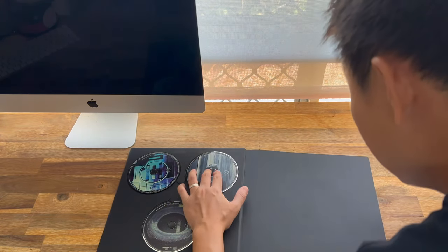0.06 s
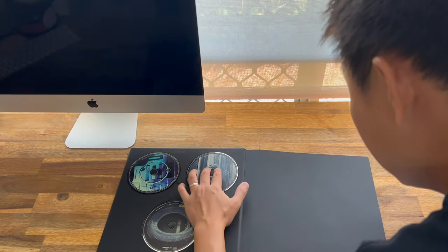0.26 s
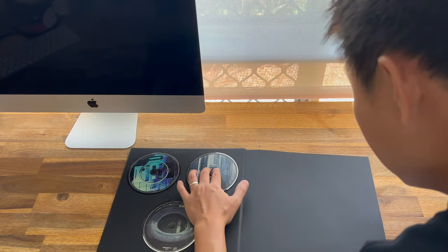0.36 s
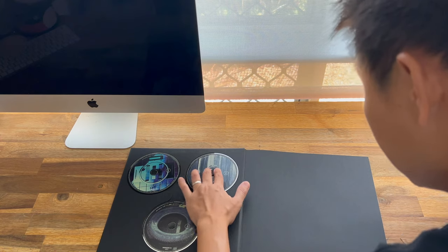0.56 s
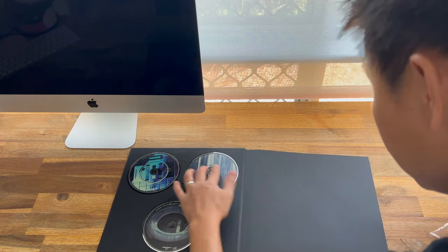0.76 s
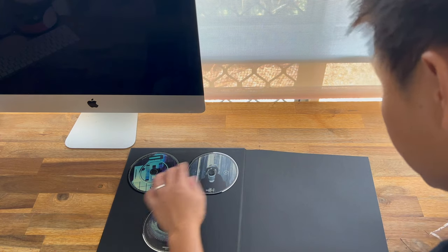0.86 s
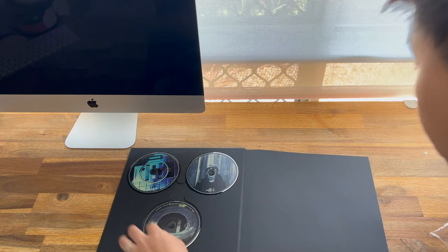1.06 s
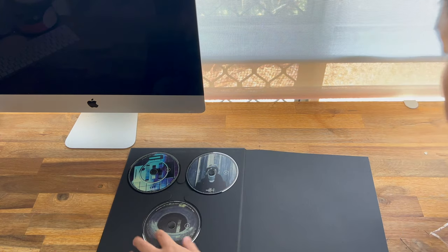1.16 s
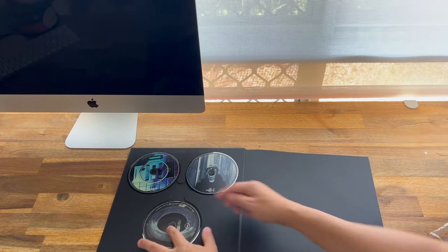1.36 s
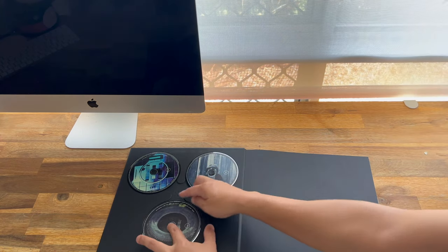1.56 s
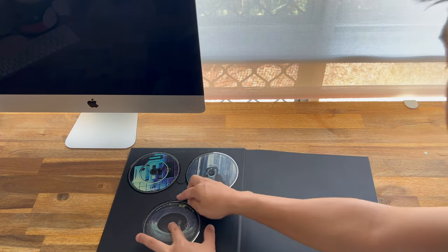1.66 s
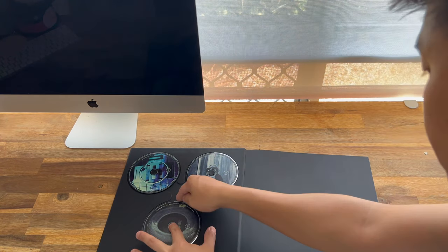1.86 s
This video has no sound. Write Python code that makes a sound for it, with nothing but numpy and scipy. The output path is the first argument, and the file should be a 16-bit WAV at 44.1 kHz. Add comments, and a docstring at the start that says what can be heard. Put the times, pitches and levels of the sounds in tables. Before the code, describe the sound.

Compact discs snap onto plastic spindles in a hardcover book on a table. A light click at 0.2 seconds leads to two sharp snaps near 0.4 and 0.5, then a smaller one at 0.75. A fingertip squeaks briefly at about 0.85 and judders softly over the cover around 1.0. Faint rubbing follows, with another tiny squeak at 1.5. The small room hums faintly throughout.

```python
"""Sharp plastic snaps: compact discs are pressed onto spindles in a hardcover book on a wooden table.
Each snap makes the book's stiff board, the disc and the spindle ring, and a small room answers.
Fingers squeak on a disc as they stick and slip, and they brush and judder over the cover.
Behind it all the room hums faintly."""
import sys
import numpy as np
from scipy import signal
from scipy.fft import rfft, irfft, next_fast_len
from scipy.io import wavfile
from scipy.ndimage import map_coordinates

SR = 44100
rng = np.random.default_rng(int(sys.argv[2]) if len(sys.argv) > 2 else 0)


def generate_wav(sig):
    """Save sig (samples, or channels by samples) to the path in sys.argv[1] as 16-bit PCM at SR."""
    pcm = np.round(np.clip(np.atleast_2d(sig).T, -1, 1) * 32767).astype(np.int16)
    wavfile.write(sys.argv[1], SR, pcm)


N = 83790


def amp(db):
    """Turn decibels into a volume multiplier."""
    return 10 ** (np.asarray(db) / 20)


def unit(x):
    """Scale a sound to an average (rms) level of 1."""
    return x / np.sqrt(np.mean(x ** 2) + 1e-20)


def fade(t, fade_s):
    """A dying curve that drops 60 dB every fade_s seconds."""
    return np.exp(-np.log(1000) * t / fade_s)


def along(points, hz):
    """Read between (pitch_hz, value) points, with octaves evenly spaced."""
    pitches, values = np.transpose(points)
    return np.interp(np.log(hz + 1), np.log(pitches + 1), values)


def wobble(rate):
    """A smooth random curve through rate new values a second."""
    values = rng.standard_normal(int(N * rate / SR) + 4)
    return map_coordinates(values, [np.arange(N) * rate / SR])


def filtered(x, response):
    """Turn each frequency up or down by response(hz)."""
    size = next_fast_len(len(x) + SR // 4)
    return irfft(rfft(x, size) * response(np.fft.rfftfreq(size, 1 / SR)), size)[:len(x)]


def one_side(x, hz, kind, order):
    """Keep the "low" or "high" side of hz; a higher order cuts more steeply."""
    return signal.sosfilt(signal.butter(order, hz, kind, fs=SR, output="sos"), x)


def band(x, low_hz, high_hz, order):
    """Keep what lies between two frequencies."""
    return one_side(one_side(x, low_hz, "high", order=4), high_hz, "low", order)


def noise(colour):
    """Steady noise whose tone follows (pitch_hz, gain_db) points."""
    return unit(filtered(rng.standard_normal(N), lambda hz: amp(along(colour, hz))))


def add(out, start_s, x):
    """Mix x into out, beginning at start_s."""
    part = out[max(round(start_s * SR), 0):][:len(x)]
    part += x[:len(part)]


def background():
    """Room air with a wavering hum; the air sinks near the end."""
    # tone of the air: pitch_hz, gain_db
    air_colour = [(25, -31.5), (70, -20.5), (130, -2), (200, -3), (260, 0.5), (380, -9.5), (530, -6),
                  (900, -11), (1800, -18.5), (3600, -22.5), (4700, -16), (6000, -26.5), (11000, -32.5),
                  (16000, -46.5)]
    # loudness of the air: time_s, level_db
    air_levels = [(0, -61), (.9, -61.5), (1.48, -63), (1.63, -65), (1.699, -65), (1.77, -66.5), (1.9, -66)]
    # tones of the hum: pitch_hz, level_db
    hum_tones = [(172, -74), (262, -70.5), (518, -78)]
    t = np.arange(N) / SR
    air = noise(air_colour)
    hiss = filtered(air, lambda hz: hz ** 4 / (hz ** 4 + 1000 ** 4))  # the part above 1000 Hz
    hiss_dip_db = np.interp(t, (1.6, 1.8), (0, -0.5))
    air = air - hiss + hiss * amp(hiss_dip_db)
    air *= amp(np.interp(t, *np.transpose(air_levels)))
    hum = sum(amp(db + wobble(3)) * np.sin(2 * np.pi * hz * t + 0.3 * wobble(5.4))
              for hz, db in hum_tones)
    return air + hum


def room(x):
    """Many reflections blur into a tail in which each frequency dies at its own speed."""
    # how long the room rings: pitch_hz, fade_s
    fade_times = [(200, 0.75), (600, 0.2), (1200, 0.29), (3200, 0.26), (8000, 0.25), (15000, 0.4)]
    # tone of the room: pitch_hz, gain_db
    colour = [(150, -8.5), (400, -2.5), (650, 5.5), (1150, -1), (2000, 3), (3050, 3), (4100, 5.5),
              (5400, -1.5), (7500, 3.5), (15000, -12.5)]
    rise_s = 0.0021
    hz, t, spectrum = signal.stft(rng.standard_normal(SR // 2), SR, nperseg=256)
    fade_s = along(fade_times, hz)[:, None]
    equal_energy = np.sqrt(2 * np.log(1000) / fade_s / SR)  # longer tails start softer
    shape = fade(t, fade_s) * equal_energy * amp(along(colour, hz))[:, None]
    tail = signal.istft(spectrum * shape, SR, nperseg=256)[1]
    tail *= 1 - np.exp(-(np.arange(len(tail)) / SR / rise_s) ** 2)
    return signal.fftconvolve(x, tail)[:len(x)]


def friction(strokes, colour, grain_db, grain_rate):
    """Grainy rubbing that swells and fades with each stroke."""
    t = np.arange(N) / SR
    level = sum(amp(db) * np.exp(-((t - peak_s) / np.where(t < peak_s, rise_s, fall_s)) ** 2 / 2)
                for peak_s, rise_s, fall_s, db in strokes)
    return level * unit(noise(colour) * amp(grain_db * wobble(grain_rate)))


def hands():
    """Skin drags over the book and a disc: dull rubs, gritty slides and bright skims."""
    # strokes: peak_s, rise_s, fall_s, level_db
    rubs = [(1.06, 0.033, 0.046, -65), (1.3, 0.037, 0.034, -74.5), (1.535, 0.025, 0.058, -57),
            (1.725, 0.026, 0.022, -64.5), (1.84, 0.017, 0.026, -66)]  # a hand on the cover
    slides = [(.775, 0.016, 0.0067, -53.5), (1.06, 0.029, 0.044, -61.5), (1.118, 0.019, 0.018, -72.5),
              (1.29, 0.081, .12, -69.5), (1.56, 0.045, 0.088, -73.5), (1.725, 0.022, 0.018, -78)]  # skin on the board
    skims = [(.052, 0.014, 0.016, -64.5), (.62, .07, 0.1, -73), (.705, 0.0036, 0.023, -62)]  # fingers on a disc
    # tone of each kind of stroke: pitch_hz, gain_db
    rub_colour = [(100, -16.5), (400, -11), (700, 1.5), (950, -3), (1250, -7.5), (1800, -11), (3000, -22.5),
                  (7000, -29), (15000, -42)]
    slide_colour = [(300, -10), (1500, 1.5), (2500, 7), (4500, 4.5), (7500, -1.5), (10000, -8.5),
                    (15000, -25)]
    skim_colour = [(1000, -21), (5000, -10.5), (8000, -4.5), (9500, -12), (11800, -1), (13500, -11),
                   (16000, -17.5)]
    return (friction(rubs, rub_colour, grain_db=-1, grain_rate=60)
            + friction(slides, slide_colour, grain_db=5.5, grain_rate=370)
            + friction(skims, skim_colour, grain_db=2.5, grain_rate=100))


def judder():
    """A finger judders over the cover in a run of uneven little slips."""
    start_s, end_s, slips_per_s = 0.93, 1.125, 150
    slips = np.zeros(N)
    for even_s in np.arange(start_s, end_s, 1 / slips_per_s):
        slip_s = even_s + rng.normal(0, 0.31) / slips_per_s
        add(slips, slip_s, np.array([amp(rng.normal(-44.5, 3))]))
    ticks = band(slips, low_hz=1700, high_hz=5800, order=4)
    return ticks + amp(-8) * room(ticks)


def squeaks():
    """A fingertip sticks and slips on a disc in short falling chirps."""
    # fingertip squeaks: start_s, length_s, pitch_hz, relative_level_db
    chirps = [(0.8335, 0.014, 2330, -44), (0.8575, 0.007, 2170, -49), (1.325, 0.02, 3200, -67),
              (1.44, 0.025, 3200, -65), (1.526, 0.012, 1270, -43)]
    sag_per_s, roughness = 6, 0.02
    out = np.zeros(N)
    for start_s, length_s, hz, db in chirps:
        t = np.arange(int(length_s * SR)) / SR
        pitch_hz = hz * (1 - sag_per_s * t + roughness * wobble(490)[:len(t)])
        tone = np.sin(2 * np.pi * np.cumsum(pitch_hz) / SR)
        add(out, start_s, amp(db - 4) * signal.windows.tukey(len(t), .5) * tone)
    return out + amp(-12.5) * room(out)


def ring(tones, t):
    """A struck object rings with its own dying tones, a little differently each time."""
    scatter_db, attack_s = 0.1, .0001
    ringing = sum(amp(db - scatter_db * rng.standard_normal())
                  * fade(t, fade_s) * np.cos(2 * np.pi * hz * t) for hz, db, fade_s in tones)
    return ringing * (1 - np.exp(-t / attack_s))


def crack(t, low_hz, top_hz):
    """The two parts of a plastic crack: a sharp pulse and the crackle after it."""
    burst = rng.standard_normal(len(t)) * fade(t, fade_s=.008)
    return band(np.array([t == 0, burst / np.linalg.norm(burst)]), low_hz, top_hz, order=8)


def snaps():
    """Each contact cracks, rings the board, disc and spindle, thumps the table and echoes."""
    # contacts: start_s, board_db, board_low_hz, board_bright_hz, board_pitch_ratio,
    # disc_db, disc_pitch_ratio, disc_room_db, spindle_db, crack_db, crack_low_hz,
    # top_hz, thump_db, room_db (each db is a gain on that part)
    contacts = [(0.2370, -19.5, 595, 2100, 1.01, -27.5, 0.97, 10, -23.5, -34, 3000, 5370, -82, -15.5),
                (0.3672, -12, 600, 2940, 1.004, -15, 1.018, 2, -5, 2, 1099, 13970, -42.5, -8),
                (0.4881, -15.5, 574, 940, 0.97, -45, 1.04, 2, -53, -27.5, 1500, 3020, -69.5, -37),
                (0.4969, -6.5, 441, 970, 1.017, -27, 1.043, 4.5, -24, -9, 1500, 13100, -54, -8),
                (0.7004, -47.5, 493, 1190, 0.92, -81, 0.94, -6.5, -69.5, -47, 1700, 14000, -65, -2),
                (0.7395, -17.5, 620, 480, 1.086, -34.5, 0.67, -1, -54, -10, 1730, 4030, -69, -13),
                (0.7673, -36, 250, 875, 1.17, -77, 1.2, -3, -54, -41, 2530, 9300, -61, -8.5)]
    # each part's own tones: base_pitch_hz, relative_level_db, base_fade_s
    board_tones = [(360, -14.5, .025), (600, -23.5, 0.012), (721, -7, 0.033), (785, -28, 0.037),
                   (913, -14.5, 0.054), (1112, -1, 0.025), (1185, -10.5, 0.038), (1428, -6.5, 0.017),
                   (1660, -18, .025)]
    disc_tones = [(2960, -6, .016), (3210, -10, 0.014), (3210, -2.5, 0.0069), (3374, -4, 0.0081)]
    spindle_tones = [(4800, -15.5, 0.003), (5130, -4.5, .007), (5538, -3, 0.007), (9100, -13.5, .004),
                     (12000, -24, 0.0038), (14800, -20.5, .002)]
    # echoes off a screen and a wall: delay_s, gain_db
    echoes = [(.0034, -10), (.0094, -15)]
    thump_s, disc_echo_s = 0.0024, .0092
    out, t = np.zeros(N), np.arange(SR // 2) / SR
    for (start_s, board_db, board_low_hz, board_bright_hz, board_pitch_ratio,
         disc_db, disc_pitch_ratio, disc_room_db, spindle_db, crack_db, crack_low_hz,
         top_hz, thump_db, room_db) in contacts:
        board = amp(board_db) * ring(board_tones, t * board_pitch_ratio)
        board = band(board, board_low_hz, high_hz=1750, order=6)
        board = one_side(board, board_bright_hz, "low", order=2)
        disc = amp(disc_db) * ring(disc_tones, t * disc_pitch_ratio)
        disc = band(disc, 2300 * disc_pitch_ratio, 3400 * disc_pitch_ratio, order=4)
        spindle = amp(spindle_db) * ring(spindle_tones, t)
        spindle = band(spindle, low_hz=4170, high_hz=top_hz, order=8)
        pulse, crackle = amp(crack_db) * crack(t, crack_low_hz, top_hz)
        direct = board + disc + spindle + pulse + amp(-2.5) * crackle
        tail = room(board + spindle + amp(disc_room_db) * disc) + amp(4) * room(pulse)
        thump = amp(thump_db) * np.exp(-t / thump_s)
        add(out, start_s, direct + thump + amp(room_db) * tail)
        add(out, start_s + disc_echo_s, amp(-2.5) * disc)  # the flat disc beams its ring at the wall
        for delay_s, db in echoes:
            add(out, start_s + delay_s, amp(db) * one_side(direct, hz=6030, kind="low", order=1))
    return out


def scene():
    """Everything heard together at one microphone."""
    return (snaps() + squeaks() + hands() + background() + judder())[None]


def record(dry):
    """Flatten peaks beyond full scale and remove the very highest treble."""
    top_hz, edge_hz = 16500, 400
    return np.array([filtered(channel, lambda hz: np.clip((top_hz - hz) / edge_hz + .5, 0, 1))
                     for channel in np.clip(dry, -1, 1)])


dry = scene()
out = record(dry)
generate_wav(out)
```